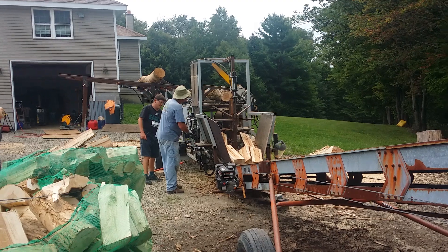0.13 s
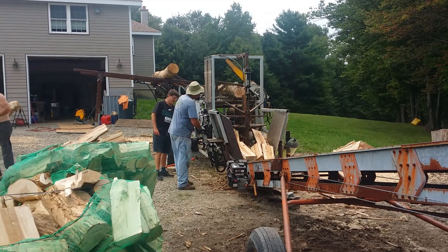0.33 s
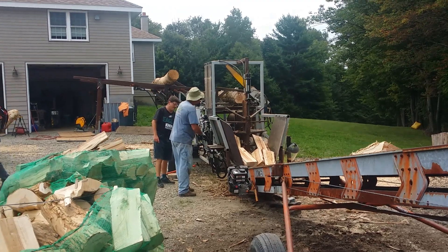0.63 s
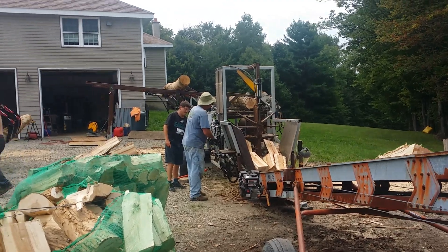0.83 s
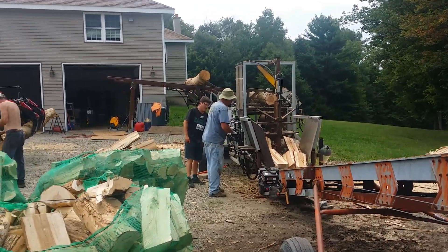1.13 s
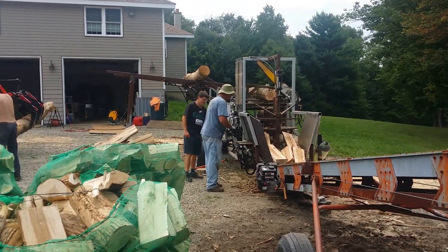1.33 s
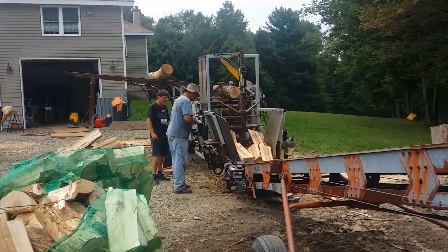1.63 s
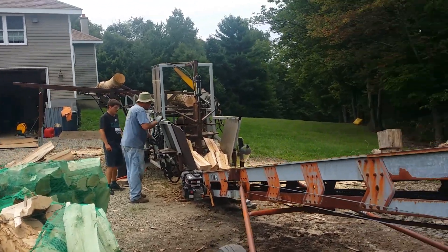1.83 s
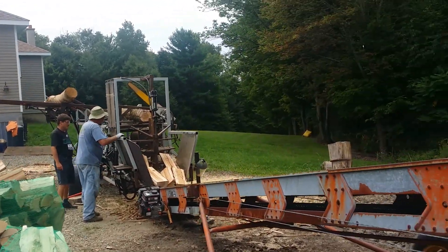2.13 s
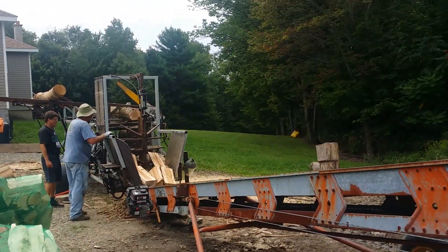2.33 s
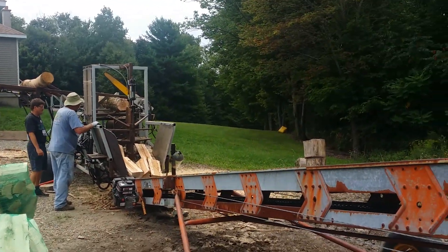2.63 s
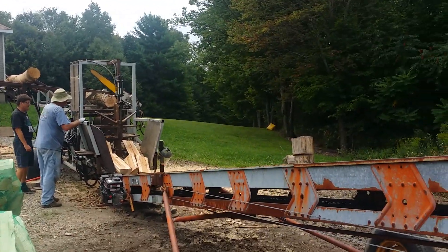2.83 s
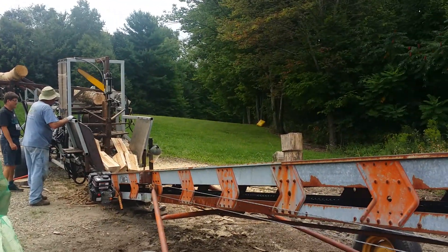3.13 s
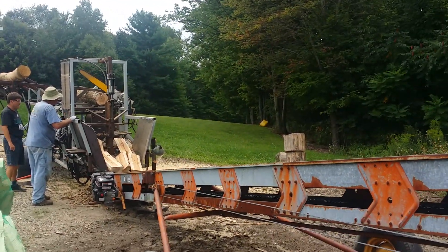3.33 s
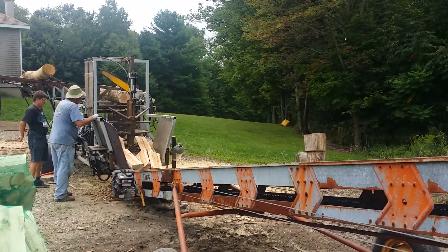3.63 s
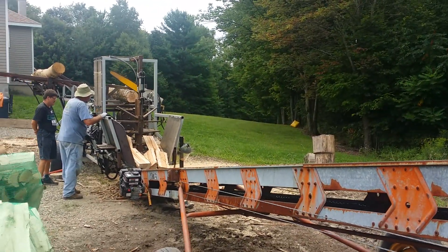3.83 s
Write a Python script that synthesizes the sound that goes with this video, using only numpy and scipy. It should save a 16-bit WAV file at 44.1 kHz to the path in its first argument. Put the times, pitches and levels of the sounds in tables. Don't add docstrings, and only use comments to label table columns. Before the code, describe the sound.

Low droning engines and rough machinery roar fill an outdoor yard. Metallic chain snaps and hollow wood knocks come irregularly throughout, over a broad hiss that brightens as the handheld microphone turns toward the conveyor.

```python
import sys
import numpy as np
from scipy import signal
from scipy.fft import rfft, irfft, next_fast_len
from scipy.io import wavfile
from scipy.ndimage import uniform_filter1d, map_coordinates

SR = 44100
rng = np.random.default_rng(int(sys.argv[2]) if len(sys.argv) > 2 else 0)


def amplitude_ratio(level_db):
    exponent = np.asarray(level_db, float) / 20
    return 10 ** exponent


def bounce(signal):
    frames = np.transpose(np.atleast_2d(signal))
    limited = np.clip(frames, -1, 1)
    pcm = np.round(limited * 32767).astype(np.int16)
    wavfile.write(sys.argv[1], SR, pcm)


N = 176400
T = np.arange(N) / SR

# multiple of its firing rate, level/dB
STEADY_NOTES = [(1, -45.5), (2, -28.5), (3, -24.5), (4, -36.5), (5, -33), (6, -54.5), (7, -40)]
# t/s, firing rate f/Hz, throttle level/dB
LOAD = [(.4, 25.2, -3.5), (.6, 24.86, -7), (.85, 24.56, -3), (1.1, 25.32, -4), (1.45, 25.84, 2.5),
        (1.52, 24.1, -13), (1.62, 21.62, 1.5), (1.72, 22.57, -2), (1.85, 24.53, -1.5), (2.05, 24.72, -9),
        (2.25, 23.51, 1), (2.55, 23.9, 0), (2.8, 23.8, 2), (4.0, 24.05, -1.9)]
# multiple of its firing rate, level/dB
LOADED_NOTES = [(2, -65), (3, -33.5), (4, -45), (5, -25), (6, -28), (7, -34.5), (8, -34.5), (9, -41.5),
                (10, -36)]
# f/Hz, level/dB
ROAR_COLOUR = [(24, -49), (40, -19), (104, -12.5), (160, -0.5), (300, -7.5), (900, -11.5), (2350, -21.5),
               (3300, -32.5), (7000, -70)]
# f/Hz, width/Hz, level/dB (level unused)
PANEL_RINGS = [(539, 65, 0), (974, 61, -3), (1414, 120, -3), (2036, 290, -3), (6500, 830, 0),
               (8800, 240, -4)]
# t/s, level/dB
TROUGH_DRUMMING = [(0.42, -44), (0.6, -28.5), (0.73, -23.5), (1.45, -31.5), (1.55, -18), (1.79, -33),
                   (1.83, -17.5), (2.07, -27), (2.84, -21.5), (2.94, -44), (3.05, -18.5), (3.13, -33.5),
                   (3.81, -22), (3.85, -44), (4.0, -17)]
# f/Hz, level/dB
HISS_COLOUR = [(1000, -47), (2400, -1.5), (3190, -2.5), (4300, -3.5), (6560, -3.5), (7700, -6), (12000, -6),
               (15000, -6.5)]
# t/s, level/dB
FACING_CHAIN = [
    (.4, -6),
    (1.0, -4.5),
    (1.5, -4),
    (2.0, -3),
    (2.6, -2.5),
    (3.2, -1.5),
    (3.7, -2),
    (4.0, -1),
]
# t/s, peak level/dB, clank share/dB, brightness/dB, left over right/dB
LINK_SNAPS = [(0.5082, -22, -13, -11, 6), (0.5423, -18.5, -11, -14, 5), (0.6694, -17.5, -9, -11, 1.5),
              (0.8165, -21, -8, -14, 2.5), (0.844, -9, -10, -17, 3.5), (0.8914, -16, -9.5, -9, 1.0),
              (0.9244, -16, -16, -11, 1.0), (1.0604, -18.5, 0, -15, 1.0), (1.1179, -25, -12, -11, 2.0),
              (1.1514, -10, -8, -13, 5), (1.2027, -11, -14, -15, 1.5), (1.2717, -14, -10, -6.5, -1),
              (1.4536, -13.5, -19, -8, -4), (1.4764, -16, -8, -11, -2), (1.6629, -13, -14.5, -21, 4),
              (1.7504, -11.5, -12, -19, 1.0), (1.8236, -13, -16, -20, 0.5), (1.8879, -10, -23, -18, 1.5),
              (1.9674, -14, -13, -14, 4.5), (1.9674, -9.5, -10, -13, 4), (2.0733, -4.5, -10, -14, 2),
              (2.1484, -14, -14, -13, 1.5), (2.3756, -7.5, -11, -12, 3), (2.4624, -13.5, -8.5, -11, 1.0),
              (2.6534, -8.5, -11, -11, -4), (2.857, -11, -8.5, -12, 3), (2.9599, -11.5, -13, -11, -0.5),
              (3.052, -11.5, -15, -12, 4), (3.1657, -8.5, -10, -14, 3), (3.2687, -8.5, -12, -14, 0.0),
              (3.3636, -12.5, -12, -19, 6), (3.4802, -11, -14, -19, 12), (3.5734, -11, -11, -17, 3.0),
              (3.699, -25, -20, -14.5, 5.5), (3.7994, -11, -14.5, -16, 7), (3.9494, -13.5, -9, -14, -2)]
# f/Hz, width/Hz, level/dB
LINK_STEEL = [(2050, 1200, 0), (3910, 480, 4), (6410, 1570, 4.5), (8600, 1400, 6), (12200, 1800, -5)]
# t/s, peak level/dB, rattle length/s
LOG_LANDINGS = [(0.897, -6.5, 0.04), (1.202, -6.5, 0.054), (1.473, -5.5, 0.02), (1.752, -10.5, 0.054),
                (2.017, -17.5, 0.063), (2.201, -34, 0.044), (2.528, -36, 0.034), (2.93, -20, 0.033),
                (3.063, -17, 0.057), (3.36, -16, 0.063), (3.543, -25, 0.031)]
# f/Hz, width/Hz, level/dB
LOG_AND_TROUGH = [(280, 80, -3), (379, 42, 0), (529, 55, 3.5), (780, 140, -4.5), (1060, 95, -8),
                  (1540, 104, -7), (1920, 290, -12)]
# t/s, peak level/dB, ring f/Hz
WOOD_KNOCKS = [(0.558, -18, 401), (0.902, -3, 499), (0.959, -7, 493), (1.167, -18, 1064),
               (1.207, -7.5, 487), (1.388, -12, 557), (1.44, -15, 525.5), (1.478, -6, 492),
               (1.525, -13, 415), (1.663, -14, 1027), (1.74, -9, 670), (1.752, -5.5, 518),
               (1.863, -18, 435), (1.901, -9.5, 513), (1.968, -12, 939), (2.023, -7.5, 490),
               (2.104, -9.5, 532), (2.157, -9.5, 519), (2.196, -8.5, 527.5), (2.241, -16, 550),
               (2.359, -11, 843), (2.38, -10, 543.3), (2.431, -17, 560), (2.464, -14, 569),
               (2.479, -14, 484), (2.531, -19, 543), (2.619, -14, 577), (2.659, -14, 575),
               (2.687, -19, 547), (2.805, -17, 498), (2.928, -7.5, 520), (2.976, -8, 477),
               (3.057, -11, 904), (3.177, -13, 538), (3.228, -19, 521), (3.279, -10, 570), (3.42, -12, 544),
               (3.516, -15, 602), (3.549, -17, 385), (3.562, -9.5, 500), (3.799, -18, 582),
               (3.841, -14, 576), (3.891, -12, 577), (3.943, -10.5, 735)]
# t/s, level/dB
OIL_PRESSURE = [
    (.4, -37.5),
    (1.6, -40.5),
    (2.0, -39),
    (2.6, -53),
    (3.2, -39),
    (3.5, -30.5),
    (3.75, -32),
    (4.0, -34),
]
# f/Hz, side over middle level/dB
STEREO_WIDTH = [(40, -13), (100, -30), (300, -20), (600, -12.5), (1200, -0.5), (2400, -1.5), (5000, 1.7),
                (15000, 0)]
# f/Hz, left over right level/dB
EAR_BALANCE = [(40, .9), (150, 1.7), (500, .9), (1200, -1.4), (2400, 1.1), (5000, 4.2), (9000, -4),
               (14000, -.1)]
# t/s, level/dB
FADE_IN = [
    (.389, -27),
    (.42, -15.5),
    (.5, -9.5),
    (.62, -2),
    (.8, -3),
    (1.3, -0.7),
    (2.0, 0.4),
]

STEADY_HZ = 50.15


def unit(x):
    return x / np.sqrt(np.mean(x ** 2) + 1e-20)


def along(points, hz):
    f, v = np.transpose(points)
    return np.interp(np.log(hz + 1), np.log(f + 1), v)


def curves(rows):
    s, *cols = np.transpose(rows)
    return [np.interp(T, s, c) for c in cols]


def wobble(rate):
    return map_coordinates(rng.standard_normal(int(4 * rate) + 9), [T * rate])


def filtered(x, response):
    m = next_fast_len(N + SR // 2)
    return irfft(rfft(x, m) * response(np.fft.rfftfreq(m, 1 / SR)), m)[..., :N]


def rings(peaks):
    def response(f):
        total = 0
        for k, (centre, width, db) in enumerate(peaks):
            damping = 1j * f * width
            total = total + (-1) ** k * amplitude_ratio(db) * damping / (centre * centre - f * f + damping)
        return total
    return response


def ringing_noise(centre_hz, width_hz):
    return unit(filtered(rng.standard_normal(N), lambda f: rings([(centre_hz, width_hz, 0)])(f) ** 2))


def wide(colour, patchy_db=0):
    z = signal.stft(rng.standard_normal((2, N)), nperseg=512)[2]
    patches = uniform_filter1d(rng.standard_normal(z.shape[1:]), 5, 0)
    patches = unit(uniform_filter1d(patches, 8, 1))
    pair = signal.istft(z * amplitude_ratio(patchy_db * patches), nperseg=512)[1][:, :N]
    spread = lambda f: np.array([np.ones_like(f), amplitude_ratio(along(STEREO_WIDTH, f))])
    mid, side = filtered(pair, lambda f: colour(f) * spread(f))
    return np.array([mid + side, mid - side]) / np.sqrt(np.mean(mid ** 2))


def near(colour):
    pair = wide(colour)
    mid, side = pair[0] + pair[1], amplitude_ratio(-3.5) * (pair[0] - pair[1])
    before = np.roll(mid + side, round(.00045 * SR))
    after = np.roll(mid + side, round(-.0001 * SR))
    left = np.where(T < 2.95, before, after)
    pair = unit(np.array([left, mid - side]))
    return pair / np.sqrt(abs(uniform_filter1d(pair ** 2, size=100, axis=1)) + .2)


def orders(turns, table, shimmer_db, rate):
    total = 0
    for k, db in table:
        level = np.sqrt(2) * amplitude_ratio(db + shimmer_db * wobble(rate))
        phase = 2 * np.pi * (round(k) * turns + rng.random()) + 0.14 * wobble(rate)
        total = total + level * np.sin(phase)
    return total


def bursts(times, levels_db, hold, t60):
    power = np.zeros(N)
    for s, db, h in zip(times, levels_db, hold):
        age = T[round(s * SR):][:SR // 2] - s
        fall_db = 60 * np.clip(age - h, 0, None) / t60
        rise = np.clip(age / .0004, 0, 1)
        power[round(s * SR):][:SR // 2] += (amplitude_ratio(db - fall_db) * rise) ** 2
    return np.sqrt(power)


def engine_notes(turns, throttle_db):
    steady = orders(STEADY_HZ * T, STEADY_NOTES, 0.97, 6)
    loaded = amplitude_ratio(throttle_db) * orders(turns, LOADED_NOTES, 0.8, 8)
    pump = orders(107 * T, [(1, -38)], 2.1, 4)
    return steady + loaded + pump


def trough_boom():
    boom = ringing_noise(186.7, 26)
    even = boom / np.sqrt(abs(uniform_filter1d(boom ** 2, 6000)) + 0.13)
    return amplitude_ratio(0.5 + curves(TROUGH_DRUMMING)[0] - curves(FADE_IN)[0]) * even


def casing_roar(turns):
    firing_db = .6 * np.cos(2 * np.pi * turns) + .5 * np.cos(2 * np.pi * STEADY_HZ * T)
    puffs = amplitude_ratio(firing_db + .7 * wobble(9) + .3 * wobble(40))
    panels = rings([(c, w, 0) for c, w, _ in PANEL_RINGS[:4]])
    colour = lambda f: amplitude_ratio(along(ROAR_COLOUR, f)) * (1 + abs(panels(f)))
    return amplitude_ratio(-20.5) * puffs * wide(colour, patchy_db=.8)


def engines():
    hz, throttle_db = curves(LOAD)
    turns = np.cumsum(uniform_filter1d(hz, 2000)) / SR
    return engine_notes(turns, throttle_db) + trough_boom() + casing_roar(turns)


def chain_hiss():
    facing_db, = curves(FACING_CHAIN)
    ticks = (rng.random(N) < 90 / SR) * amplitude_ratio(3 * rng.standard_normal(N))
    ticks = filtered(ticks, lambda f: 1 / (1 + 2j * np.pi * f * .002))
    body = amplitude_ratio(0.15 * wobble(5.5) + 0.26 * wobble(35)) * (1 + 0.25 * unit(ticks))
    panels = rings([(c, w, 0) for c, w, _ in PANEL_RINGS[4:]])
    colour = lambda f: amplitude_ratio(along(HISS_COLOUR, f)) * (1 + amplitude_ratio(-9.5) * abs(panels(f)))
    hiss = body * wide(colour, patchy_db=0.9)
    air = filtered(hiss, lambda f: 1 / (1 + (10500 / (f + 1)) ** 8))
    return amplitude_ratio(-24 + facing_db) * (hiss - air + amplitude_ratio(1.34 * facing_db) * air)


def chain_links():
    s, db, clank_db, bright_db, pan_db = np.transpose(LINK_SNAPS)
    db = db - curves(FADE_IN)[0][np.round(s * SR).astype(int)] - 15.5
    hold, t60 = np.full(len(s), 0.013), .095
    strike = 1 + bursts(s, np.full(len(s), -2), 0 * hold, 0.03)
    snap = 0
    for level_db, steel in ((db, LINK_STEEL[1:3]), (db + bright_db + 8.5, LINK_STEEL[3:])):
        sides = np.array([bursts(s, level_db + side * pan_db / 2, hold, t60) for side in (1, -1)])
        tail = bursts(s, level_db - 15, hold, 0.87)
        snap = snap + (sides + tail) * strike * near(rings(steel))
    clank = bursts(s, db + clank_db + 13.5, hold, t60)
    return snap + clank * near(lambda f: rings(LINK_STEEL[:1])(f) ** 2)


def logs():
    s, db, hold = np.transpose(LOG_LANDINGS)
    db = db - 8
    noise = wide(rings(LOG_AND_TROUGH))
    even = noise / np.sqrt(abs(uniform_filter1d(noise ** 2, 500, 1)) + 0.053)
    rattle = bursts(s, db, hold, 0.35) * even
    crack = bursts(s, db - 5.5, hold / 3, .22) * near(rings([(1710, 2600, 1), (6200, 5500, -1)]))
    return rattle + crack


def wood_knocks():
    ring, age = np.zeros(N), T[:SR // 5]
    for at, knock_db, hz in WOOD_KNOCKS:
        tone = np.sin(2 * np.pi * hz * age) + amplitude_ratio(-5) * np.sin(2 * np.pi * 1.37 * hz * age)
        level = amplitude_ratio(knock_db - 7 - 60 * age / .13) * (1 - np.exp(-age / 0.0013))
        spot = ring[round(at * SR):][:len(age)]
        spot += (level * tone)[:len(spot)]
    return ring


def misfire_thump():
    return bursts([2.93], [-35], [.03], .15) * ringing_noise(90, 70)


def valve():
    whistle = wide(lambda f: rings([(6600, 1600, 0)])(f) ** 2, patchy_db=1.5)
    return amplitude_ratio(curves(OIL_PRESSURE)[0] + 0.6 * wobble(6.7)) * whistle


def scene():
    return engines() + chain_hiss() + chain_links() + logs() + wood_knocks() + misfire_thump() + valve()


def low_pass(x):
    return signal.sosfilt(signal.butter(12, 15730, fs=SR, output="sos"), x)


def record(dry):
    half = np.array([[.5], [-.5]])

    def ears(f):
        lag_s = .00031 / (1 + (f / 1200) ** 4)
        balance = amplitude_ratio(half * along(EAR_BALANCE, f)) * np.exp(-2j * np.pi * f * lag_s * half)
        return balance * amplitude_ratio(-30 * np.clip(f - 15150, 0, None) / 1000)

    x = filtered(dry, ears) * amplitude_ratio(curves(FADE_IN)[0]) * (T > .389)
    return low_pass(x / (1 + abs(x) ** 6) ** (1 / 6))


dry = scene()
out = record(dry)
bounce(out)
```